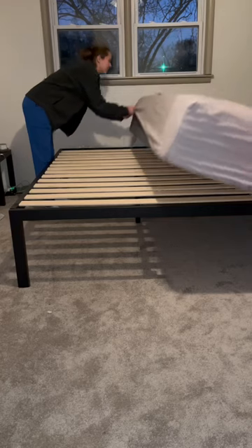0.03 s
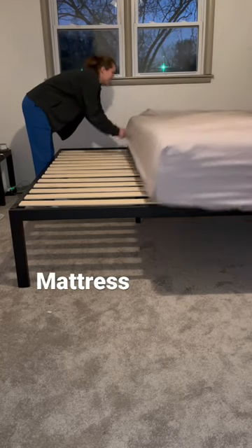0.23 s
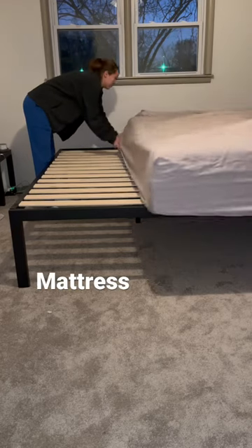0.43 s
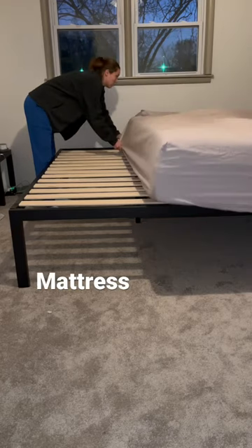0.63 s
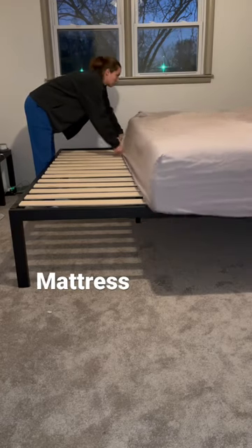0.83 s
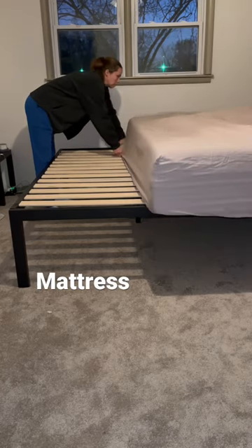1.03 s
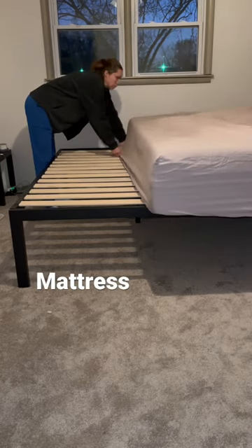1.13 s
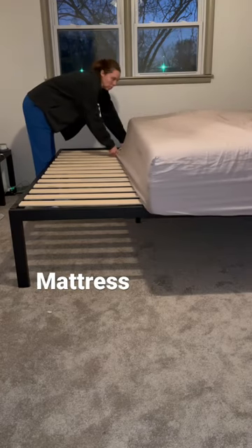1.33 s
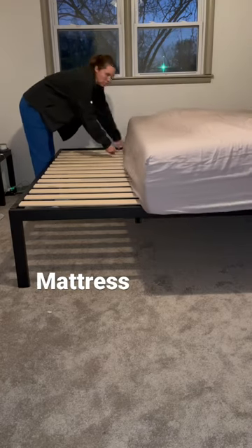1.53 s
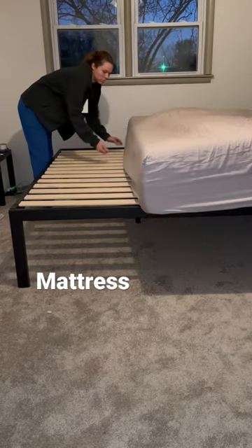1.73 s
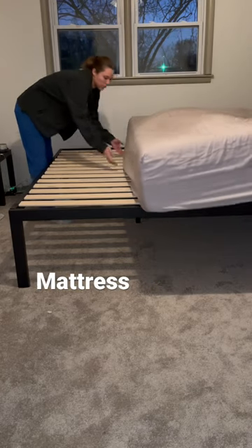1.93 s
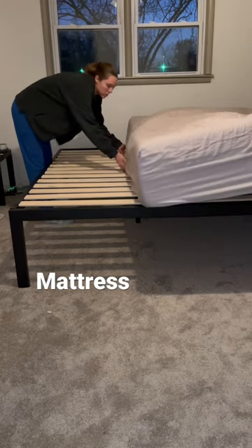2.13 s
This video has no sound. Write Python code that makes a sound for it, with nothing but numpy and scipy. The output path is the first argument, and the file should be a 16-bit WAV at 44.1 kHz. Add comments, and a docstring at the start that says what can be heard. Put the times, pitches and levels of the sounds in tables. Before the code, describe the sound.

A mattress thuds onto wooden bed slats, followed by soft rustling and dull knocks.

```python
"""A carpeted bedroom, a stereo microphone close to a metal bed frame with wooden slats.
First a heavy mattress flops down: its cover snaps and swishes, the slats clatter, the frame rings
and the load bounces deeply. Then the sheet rustles as the mattress is nudged into place, with
dull scuffs and soft knocks of the frame. Last, a hand rasps over the cover."""
import sys
import numpy as np
from scipy import signal
from scipy.fft import rfft, irfft
from scipy.io import wavfile

SR = 44100
rng = np.random.default_rng(int(sys.argv[2]) if len(sys.argv) > 2 else 0)


def master(y):
    """Save y as 16-bit WAV."""
    cut = np.clip(np.atleast_2d(y).T, -1, 1)
    pcm = np.round(cut * 32767)  # scale
    wavfile.write(sys.argv[1], SR, pcm.astype(np.int16))


N = 97020
T = np.arange(N) / SR
HZ = np.maximum(np.arange(N + 1) * SR / (2 * N), 1)

# The mattress hits the slats. Each row: start in seconds, relative level in dB, cut-off in Hz.
BLOWS = [(.204, 1, 980), (.210, -4.5, 690), (.219, -5, 1190), (0.231, -5.5, 1010), (0.239, 0, 1620),
         (.264, -4, 890), (.287, -10, 700), (0.333, -6, 666), (0.361, -11.5, 572)]
# Tone of a blow. Each row: frequency in Hz, gain in dB.
BLOW_COLOUR = [(40, -1.5), (80, 25), (160, -0.5), (330, 9.5), (700, -0.5), (1300, -9), (2100, -1),
               (2900, -24), (5000, -30), (14000, -35)]
# Slats chattering under the mattress. Each row: time in seconds, level in dB.
CLATTER_LEVEL = [(.178, -70), (.194, -33.5), (.21, -30), (.224, -34), (.238, -30.5), (.27, -38),
                 (.312, -47), (.338, -45), (.375, -57.5), (.43, -75), (.5, -89)]
# Tone of the chatter. Each row: frequency in Hz, relative level in dB.
CLATTER_COLOUR = [(80, 9.5), (200, 8), (340, 5.5), (490, 3.5), (700, -2), (1000, 0.5), (1400, -1),
                  (1650, -7.5), (2100, -3), (2700, -9), (4000, -21), (12000, -37)]

def landing(blow_db=7.5, ring_db=-35.5):
    """A quick run of heavy, padded blows rings the frame; the slats chatter, and again on the rebound."""
    force = sum(from_db(db) * push(start, cut_hz) for start, db, cut_hz in BLOWS)
    thud = from_db(blow_db) * colour(force, BLOW_COLOUR)
    chatter = envelope(CLATTER_LEVEL) * friction(CLATTER_COLOUR, per_s=1500, size_db=2.5, hiss=0.48)
    return bedroom(thud + chatter) + from_db(ring_db) * frame_ring(force)


# Modes of frame and slats. Each row: frequency in Hz, relative level in dB, t60 in seconds.
FRAME_MODES = [(203, -6.5, 0.34), (258.8, 0, 0.16), (351.2, -1, 0.23), (491.6, -1.5, 0.33),
               (600, -8.5, 0.39), (636.4, -9, 0.14), (794.3, -5, 0.19), (975, -2.5, 0.13),
               (1085, -13.5, 0.73), (1321, -7.5, 0.24), (1900, 4.5, 0.14), (2030, -20, 0.13)]

def frame_ring(force):
    """A force on the bed sets its modes ringing, each with a random sign."""
    modes = sum(from_db(db) * rng.choice([-1, 1]) * swing(0, hz, t60) for hz, db, t60 in FRAME_MODES)
    return convolve(force, modes)


# Each row: start in seconds, frequency in Hz, level in dB, rise and t60 in seconds.
BOUNCES = [(0.22, 74.2, -21, 0.02, 0.12), (0.236, 40.5, -32.5, 0.055, 0.9),
           (0.386, 42.1, -33.5, 0.036, 0.38), (0.392, 76, -34.5, 0.051, 0.26),
           (0.646, 75.4, -43.5, 0.012, .18), (1.545, 74.3, -46, 0.0061, 0.36), (1.733, 83, -39, .012, 0.13),
           (1.858, 80, -44, 0.0097, 0.22), (1.949, 88, -34, 0.017, 0.14)]

def bounce():
    """The loaded frame swings deeply after the landing and the nudges."""
    return sum(from_db(db) * swing(start, hz, t60, rise) for start, hz, db, rise, t60 in BOUNCES)


# Each row: start in seconds, relative level in dB, cut-off in Hz, slat pitch in Hz.
KNOCKS = [(.563, -21.5, 1500, 275.6), (.595, -19, 235.8, 264), (0.834, -19.5, 240, 276),
          (1.726, -27.5, 810, 740), (1.738, -18.5, 198, 290), (1.752, -9, 176, 257), (1.85, -23, 334, 290),
          (1.882, -18.5, 192, 350), (1.935, -15, 930, 400), (1.944, -16.5, 600, 442),
          (1.972, -11, 280, 301), (2.114, -24.5, 407, 391), (2.146, -23, 250, 298)]
# Tone of a knock. Each row: frequency in Hz, gain in dB.
KNOCK_COLOUR = [(50, -24.5), (110, 8.5), (220, 7), (320, 11), (600, -2), (1200, -11), (3000, -45),
                (12000, -31)]

def knocks(bump_db=4.5, ring_db=-39, slat_db=-22.5, slat_t60_s=0.072):
    """Mattress and hands press on the slats: dull bumps, each with its slat's short, hollow ring."""
    force, slats = 0, 0
    for start, db, cut_hz, slat_hz in KNOCKS:
        press = from_db(db) * push(start, cut_hz)
        force += press
        slats += from_db(slat_db) * convolve(press, swing(0, slat_hz, slat_t60_s))
    bumps = from_db(bump_db) * colour(force, KNOCK_COLOUR)
    return bedroom(bumps) + slats + from_db(ring_db) * frame_ring(force)


# Each row: midpoint in seconds, peak level in dB, half length in seconds.
SCUFFS = [(0.526, -54, 0.017), (0.652, -59, .012), (0.577, -54, 0.014), (0.85, -57, 0.038),
          (1.476, -61, 0.07), (1.736, -51.5, 0.014)]
# Tone of a scuff. Each row: frequency in Hz, relative level in dB.
SCUFF_COLOUR = [(80, -13.5), (200, 10), (330, 0), (500, -2), (750, -6.5), (1300, -15), (2400, -39),
                (6000, -48)]

def scuffs():
    """The mattress slides over the slats in short, dull strokes."""
    strokes = sum(from_db(db) * np.exp(-.5 * ((T - middle) / half) ** 2) for middle, db, half in SCUFFS)
    return strokes * friction(SCUFF_COLOUR, per_s=1200, size_db=2, hiss=0.21)


# Tone of the snap. Each row: frequency in Hz, relative level in dB.
SNAP_COLOUR = [(2000, 3.5), (12000, -2), (14000, -26)]
# Course of the swish. Each row: time in seconds, level in dB.
SWISH_LEVEL = [(.178, -91), (.185, -48.5), (.2, -58), (.218, -47), (.246, -46.5), (.285, -62.5), (.4, -93)]
# Tone of the swish. Each row: frequency in Hz, relative level in dB.
SWISH_COLOUR = [(1500, -12.5), (4000, 2), (9000, 2.5), (12000, -14), (14000, -54)]

def cover(snap_s=.182, snap_db=-45, snap_t60_s=0.077):
    """The taut cover snaps at first contact and swishes as it lands."""
    decay = from_db(snap_db - 60 * np.maximum(T - snap_s, 0) / snap_t60_s)
    snap = (T > snap_s) * decay * wash(SNAP_COLOUR)
    swish = envelope(SWISH_LEVEL) * friction(SWISH_COLOUR, per_s=5000, size_db=2.5)
    return snap + swish


# Course of the rustle. Each row: time in seconds, level in dB.
SHEET_LEVEL = [(0, -66), (.045, -70), (.065, -59.5), (.12, -66.5), (.18, -58.5), (.3, -58.5), (.44, -67),
               (.555, -56.5), (.67, -68.5), (.85, -60.5), (.97, -59), (1.19, -64), (1.32, -68), (1.47, -60),
               (1.57, -69), (1.635, -59.5), (1.79, -73.5), (1.91, -68), (1.95, -60.5), (2.04, -71.5),
               (2.16, -65)]
# Tone of the rustle. Each row: frequency in Hz, relative level in dB.
SHEET_COLOUR = [(100, -2), (300, 5.5), (700, -3), (2100, 2), (3200, -2.5), (5000, -2.5), (9000, -7),
                (11500, -14.5), (14000, -30.5)]

def sheet_rustle():
    """The sheet rubs in soft swells as the mattress moves."""
    return envelope(SHEET_LEVEL) * friction(SHEET_COLOUR, per_s=5000, size_db=2.5, hiss=1.68)


# Tone of the rasp. Each row: frequency in Hz, relative level in dB.
RASP_COLOUR = [(700, -31), (1500, -9), (2080, 6.5), (2550, -9.5), (3100, -0.5), (4000, -12), (8500, -13),
               (11500, -26), (14000, -39)]

def hand_rasp(start_s=2.161, rise_s=.012, db=-44):
    """A hand drags over the cover with a bright, grainy rub."""
    onset = np.clip((T - start_s) / rise_s, 0, 1)
    return from_db(db) * onset * friction(RASP_COLOUR, per_s=2400, size_db=3.5)


# Course of the rumble. Each row: time in seconds, level in dB.
RUMBLE_LEVEL = [(0, -62), (.12, -68), (.18, -45.5), (.235, -41.5), (.6, -55), (.9, -54), (1.3, -61),
                (1.8, -53), (2.2, -57.5)]
# Tone of the rumble. Each row: frequency in Hz, relative level in dB.
RUMBLE_COLOUR = [(15, -50), (28, -28.5), (48, 3.5), (75, -2), (130, -12), (300, -21), (700, -28),
                 (3000, -66.5)]

def rumble():
    """The shifting load rumbles low in the bed."""
    return envelope(RUMBLE_LEVEL) * wash(RUMBLE_COLOUR)


# Decay of the carpeted room. Each row: band frequency in Hz, t60 in seconds.
ROOM_T60 = [(60, 0.17), (250, 0.38), (1000, 0.56), (2000, 0.41), (4000, 0.13), (12000, 0.1)]

def bedroom(direct, tail_db=-4, build_s=0.0028):
    """Close to the bed the direct sound leads; a diffuse tail follows and dies band by band."""
    noise = rfft(spread(rng.standard_normal((2, N))), 2 * N)
    tail = 0
    for band_hz, t60 in ROOM_T60:
        band = at_hz([(hz, float(hz == band_hz)) for hz, _ in ROOM_T60])
        unit_energy = np.sqrt(2 * np.log(1000) / (t60 * SR))
        tail += irfft(noise * band)[:, :N] * from_db(-60 * T / t60) * unit_energy
    return direct + from_db(tail_db) * convolve(direct, tail * np.minimum(T / build_s, 1))


# Tone of the background. Each row: frequency in Hz, relative level in dB.
FLOOR_COLOUR = [(20, 5.5), (70, -9), (300, -9.5), (1000, -16), (3000, -22), (8000, -30.5), (14000, -46)]

def noise_floor(db=-70):
    """A faint, steady hush lies under everything."""
    return from_db(db) * wash(FLOOR_COLOUR)


# Stereo width at the microphone. Each row: frequency in Hz, side gain in dB.
WIDTH = [(50, -26), (300, -8.5), (850, -4), (1600, -13.5), (4200, -10.5), (6500, -23)]

def spread(pair):
    """Two unrelated signals become a stereo field, narrow in the bass."""
    side = colour(pair[1], WIDTH)
    return np.array([pair[0] + side, pair[0] - side])


def push(start, cut_hz):
    """One padded contact: a rounded pulse of unit area, softer at a lower cut-off."""
    t = np.maximum(T - start, 0) * 2 * np.pi * cut_hz
    pulse = t * np.exp(-t)
    return pulse / (pulse.sum() + 1e-12)


def swing(start, hz, t60, rise=1 / SR):
    """A vibration that builds up, then falls 60 dB in t60 seconds."""
    t = np.maximum(T - start, 0)
    decay = from_db(-60 * np.maximum(t - rise, 0) / t60)
    return np.sin(2 * np.pi * hz * t) * np.minimum(t / rise, 1) * decay


def grains(per_s, size_db):
    """Random clicks of uneven size and sign."""
    sizes = from_db(size_db * np.minimum(rng.exponential(1, N), 4))
    return (rng.random(N) < per_s / SR) * sizes * rng.choice([-1, 1], N)


def friction(spectrum, per_s, size_db, hiss=1.0):
    """Many tiny slips and contacts over a smooth hiss; rms 1."""
    slips = unit_rms(np.array([grains(per_s, size_db) for _ in range(2)]))
    pair = slips + hiss * rng.standard_normal((2, N))
    return unit_rms(colour(spread(pair), spectrum))


def wash(spectrum):
    """Smooth stereo noise; rms 1."""
    return unit_rms(colour(spread(rng.standard_normal((2, N))), spectrum))


def colour(x, spectrum):
    """Causal (minimum-phase) filter with the given spectrum."""
    cepstrum = irfft(np.log(from_db(at_hz(spectrum))))
    cepstrum[1:N] *= 2
    cepstrum[N + 1:] = 0
    return irfft(rfft(x, 2 * N) * np.exp(rfft(cepstrum)))[..., :N]


def convolve(x, response):
    """Pass x through an impulse response."""
    return irfft(rfft(x, 2 * N) * rfft(response, 2 * N))[..., :N]


def envelope(points):
    """Gain over time from (s, dB) points."""
    return from_db(np.interp(T, *np.transpose(points)))


def at_hz(points):
    """Read a table on a log-frequency axis."""
    hz, values = np.transpose(points)
    return np.interp(np.log(HZ), np.log(hz), values)


def from_db(db):
    """Decibels to gain."""
    return 10 ** (np.asarray(db) / 20)


def unit_rms(x):
    """Scale to rms 1."""
    return x / np.sqrt(np.mean(x ** 2) + 1e-20)


def scene():
    """From the bedside: bed and cloth in front, rumble and hush beneath."""
    bed = landing() + bounce() + knocks() + scuffs()
    cloth = cover() + sheet_rustle() + hand_rasp()
    return bed + cloth + rumble() + noise_floor()


# The microphone's two ports. Each row: frequency in Hz, lead of the left port in radians.
PORT_PHASE = [(100, 0), (450, -.4), (700, -1.3), (1000, -.4), (1650, 0), (2700, 2.5), (5000, 1.1),
              (5950, 3.14), (8000, 6.28), (9750, 9.2), (10800, 9.6), (11800, 11.8), (13500, 13.2)]

def record(dry, cutoff_hz=13700):
    """The two microphone ports hear the bed out of step; the top is cut steeply."""
    lag = np.interp(HZ, *np.transpose(PORT_PHASE))
    right = irfft(rfft(dry[1], 2 * N) * np.exp(-1j * lag))[:N]
    lowpass = signal.ellip(10, .2, 80, cutoff_hz, fs=SR, output="sos")
    return signal.sosfilt(lowpass, [dry[0], right])


dry = scene()
out = record(dry)
master(out)
```